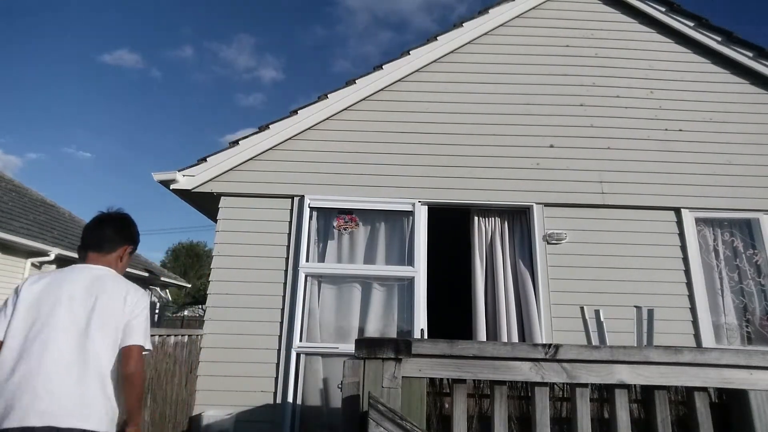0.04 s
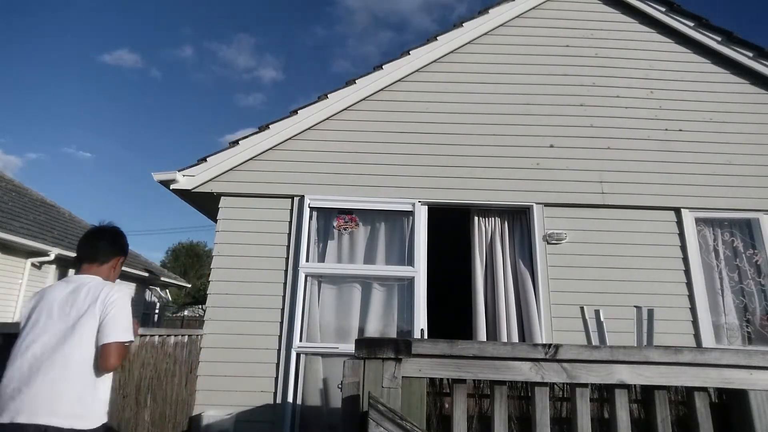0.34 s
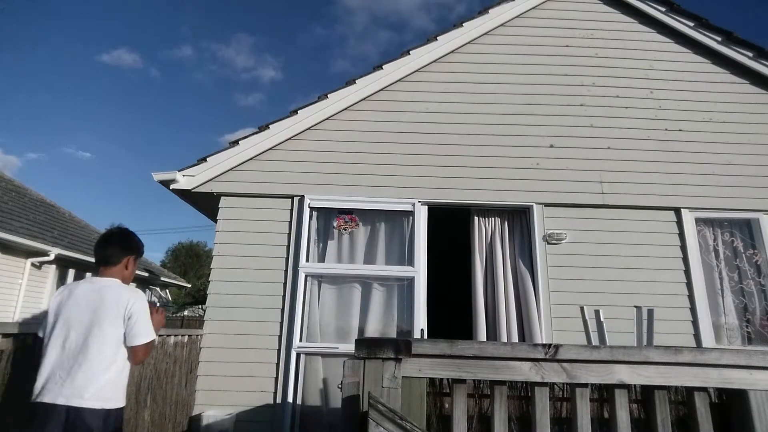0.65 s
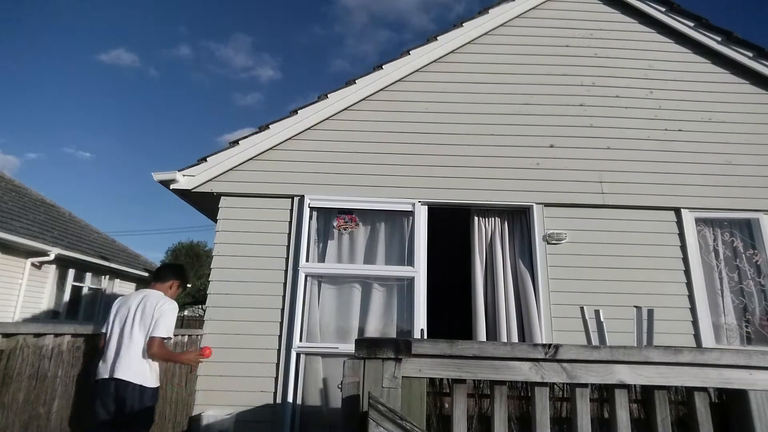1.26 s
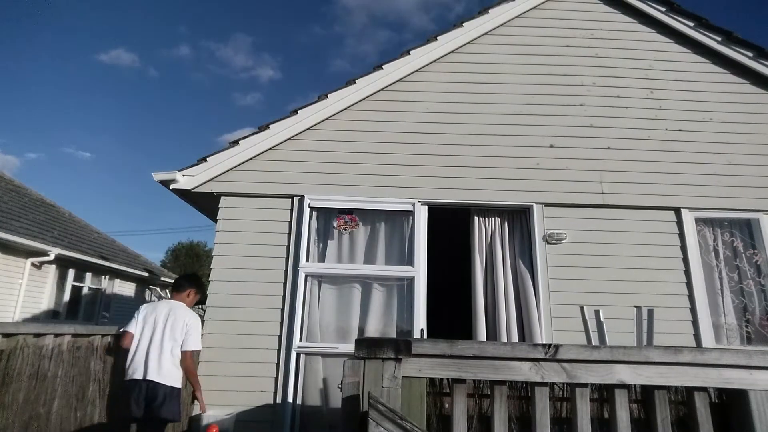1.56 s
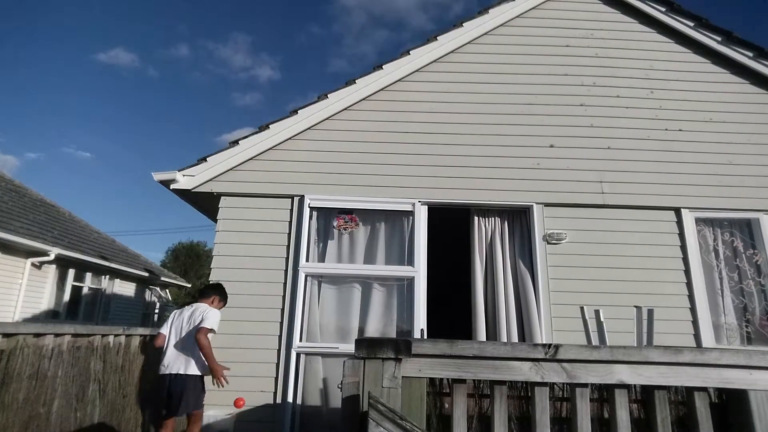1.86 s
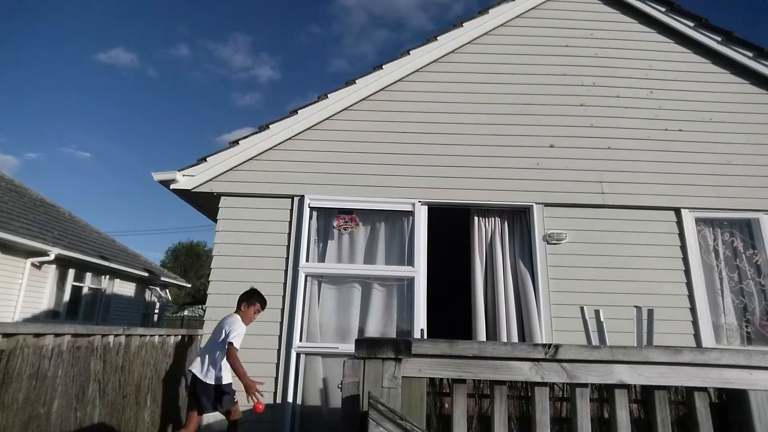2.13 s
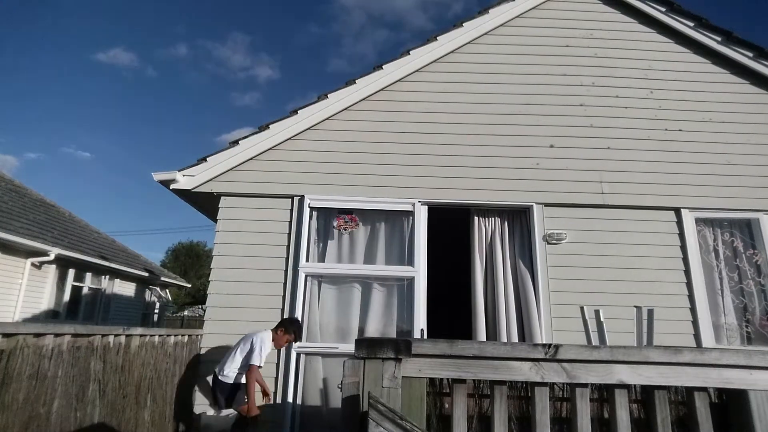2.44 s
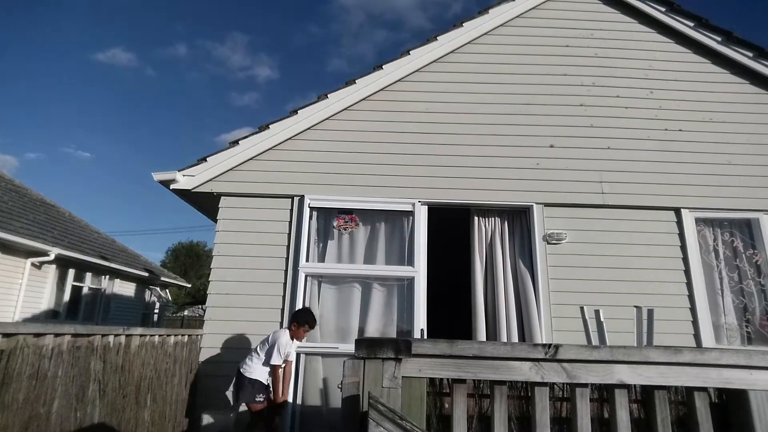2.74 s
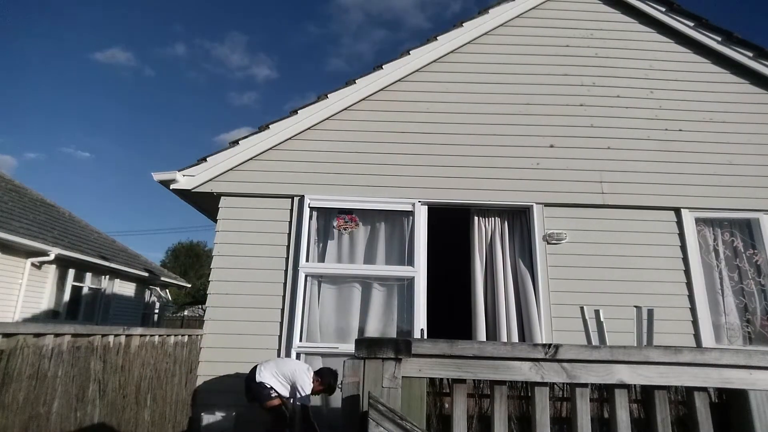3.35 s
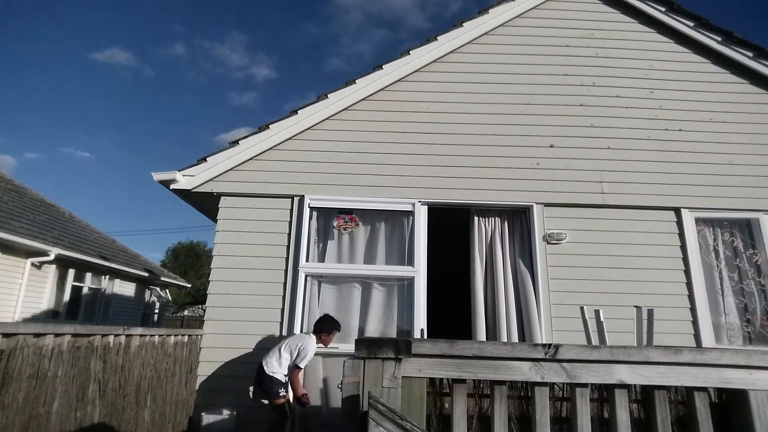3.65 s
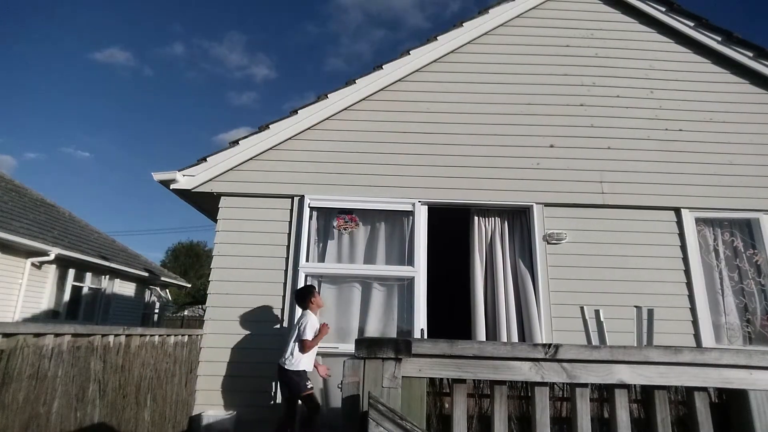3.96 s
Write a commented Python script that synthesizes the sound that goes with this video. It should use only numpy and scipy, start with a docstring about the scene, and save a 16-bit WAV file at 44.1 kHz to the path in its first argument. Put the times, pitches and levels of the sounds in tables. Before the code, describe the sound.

A small hard ball bounces on a yard path, giving a few sharp, unevenly spaced knocks with brief echoes. Wind rumbles on the microphone and grows stronger halfway through, over faint shoe scuffs and distant cicadas.

```python
"""Ball on a path beside a weatherboard house

A small hard ball is bounced and caught; wall and fence throw the knocks back, and shoes scuff on grit.
Far off, cicadas drone and a bird whistles faintly; a small insect gives thin, high chirps.
Gusts buffet each microphone port in turn, and the strongest make the recorder duck."""
import sys
import numpy as np
from scipy import signal
from scipy.fft import rfft, irfft
from scipy.io import wavfile
from scipy.ndimage import uniform_filter1d

SR = 44100
rng = np.random.default_rng(int(sys.argv[2]) if len(sys.argv) > 2 else 0)


def wrap_up_sound(samples):
    """Save the sound to the file named by the first command line argument, as 16-bit audio."""
    columns = np.atleast_2d(samples).T
    # keep every value between -1 and 1, then stretch to whole-number steps
    tamed = np.clip(columns, -1, 1)
    steps = np.round(tamed * 32767).astype(np.int16)
    wavfile.write(sys.argv[1], SR, steps)


N = 176400


def ball():
    """A small hard ball is bounced on the path and caught."""
    # knocks (time [s], relative level [dB], ring pitch [Hz], ring against crack [dB],
    # snap shelf [dB], treble shelf [dB], left over right [dB])
    knocks = [(0.0511, -5.5, 1400, -5.5, 3.5, -3, 2.5), (1.0982, -3, 3380, -20, -11, 9, 2),
              (1.3398, -14.5, 3960, -10, 14, -37, 0), (1.7746, -16, 1050, -19, -3, 7, 10.5),
              (1.7922, -1.5, 1106, -11, -4, 6, 4.5), (2.266, -29, 1280, 0.5, 5, -2, -4),
              (2.4978, -6.5, 1270, -8, -4, -5, 1), (2.8104, -33.5, 3500, -12.5, 5, 11, 4),
              (2.9661, -16.5, 3680, -19.5, 0.5, -19.5, 0.5), (3.3237, -19.5, 1400, -11.5, -8, -6, 0)]
    out = np.zeros((2, N))
    for start, *strike in knocks:
        add(out, start, knock(*strike))
    return out


def knock(db, ring_hz, ring_db, snap_db, treble_db, pan_db):
    """A crack on hard ground with a brief hollow ring, heard through the yard."""
    # spectrum of the crack before its shelves (frequency [Hz], relative level [dB])
    crack_colour = [(100, 9.5), (400, 7), (700, 4.5), (1000, -0.5), (1500, -2.5), (2050, -7), (2900, -12.5),
                    (3800, -4), (4600, -22.5), (5700, -16.5), (7500, -28), (9500, -34.5), (12000, -28),
                    (16000, -31.5)]
    snap_hz, treble_hz, ring_t60_s, trim_db = 2520, 6900, .012, .5
    hollow_hz, hollow_db = 1974, -12.5  # the ball's own ring, shared by every knock
    t = np.arange(4096) / SR
    hz = abs(np.fft.fftfreq(len(t), 1 / SR))
    snap, treble = (hz ** 4 / (hz ** 4 + edge ** 4) for edge in (snap_hz, treble_hz))
    crack = causal(read(crack_colour, hz) + snap_db * snap + treble_db * treble)
    ring, hollow = (np.sin(2 * np.pi * f * t) * amp(-60 * t / ring_t60_s) for f in (ring_hz, hollow_hz))
    parts = (crack, 0), (ring, ring_db), (hollow, hollow_db)
    blow = sum(amp(part_db) * part / np.linalg.norm(part) for part, part_db in parts)
    port_gains = amp(db + trim_db + np.array([[.5], [-.5]]) * pan_db)
    return port_gains * signal.fftconvolve(blow[None], yard(), axes=1)


def yard():
    """Direct sound, slaps off nearby boards, their scatter and a faint long tail."""
    # reflections from ground, wall and fence (delay [s], gain [dB])
    echoes = [(.0011, -7.5), (.0029, -10.5), (.0058, -8.5), (.0098, -9), (0.0134, -9), (.0232, -17.5)]
    response = amp(1.5) * tail(t60_s=.1) + amp(-8.5) * tail(t60_s=.4)
    response[0, 0] += 1
    add(response[1], .0001, np.ones(1))  # the right port hears the ball a little later
    for delay, db in echoes:
        for side in response:
            add(side, delay + rng.uniform(-.00042, .00037), amp([db]))
    return response


def scuffs():
    """Soles drag over grit: grainy hiss that swells and dies, with a short echo off the yard."""
    # shoe drags (start [s], rise [s], hold [s], release [s], level [dB])
    drags = [(1.109, 0.027, 0.084, 0.066, -58), (1.28, 0.041, 0.046, 0.022, -52),
             (1.387, 0.036, 0.035, .018, -44.5), (1.494, 0.037, 0.046, 0.18, -60),
             (1.709, 0.032, 0.018, 0.011, -53), (2.995, .03, 0.023, .04, -63)]
    # spectrum of sole on grit (frequency [Hz], relative level [dB])
    grit_colour = [(600, -3), (1200, -3), (2100, -4.5), (3000, -7), (3700, -7.5), (6600, -14.5),
                   (8200, -25.5), (10000, -23), (13000, -19.5), (16000, -18)]
    grit_db, echo_db = 3, -5.5
    t, level = np.arange(N) / SR, np.zeros(N)
    for start, rise, hold, release, db in drags:
        swell = np.clip((t - start) / rise, 0, 1)
        fade = np.exp(-2 * np.maximum(t - start - rise - hold, 0) / release)
        level += amp(db) * swell * fade
    hiss = level * unit(noise(grit_colour) * amp(grit_db * wander(rate_hz=300)))
    return hiss + amp(echo_db) * signal.fftconvolve(hiss, tail(t60_s=.3), axes=1)[:, :N]


def wind():
    """Sputtering rumble follows the gust at each port; deep booms and bright eddies grow faster still."""
    # gust strength at the left and right ports (time [s], relative level [dB])
    left_gusts = [(0, -30.5), (.05, -18), (.16, -37.5), (.3, -26), (.35, -30.5), (.48, -23), (.68, -42.5),
                  (1.15, -33.5), (1.68, -38), (1.8, -13.5), (1.89, -22), (1.98, -27), (2.02, -15),
                  (2.1, -9.5), (2.15, -22.5), (2.35, -34.5), (2.39, -16.5), (2.44, -12.5), (2.53, -13.5),
                  (2.68, -16.5), (2.8, -25.5), (2.87, -14), (2.97, -27.5), (3.1, -20), (3.26, -12),
                  (3.47, -24.5), (3.62, -16), (3.85, -24), (3.93, -12), (4, -14.5)]
    right_gusts = [(0, -37), (.42, -43), (.5, -22.5), (.68, -17.5), (0.781, -26), (1.04, -27.5),
                   (1.131, -27), (1.36, -24), (1.409, -19.5), (1.619, -25.5), (2.099, -41.5), (2.32, -26),
                   (2.411, -44), (2.6, -30), (2.921, -26.5), (3.199, -17), (3.401, -16.5), (3.48, -28.5),
                   (3.751, -19.5), (4, -23.5)]
    # spectrum of wind on the microphone (frequency [Hz], relative level [dB])
    rumble_colour = [(15, -22), (35, -4), (65, 1), (115, 1), (170, -5.5), (250, -12.5), (400, -23.5),
                     (700, -40.5), (1500, -66.5), (4000, -98)]
    deep_below_hz, eddies_above_hz, trim_db = 70, 130, 2
    deep_growth, eddy_growth, pivot_db = .35, .04, -14.5  # extra dB per dB of gust over the pivot
    t = np.arange(N) / SR
    gust_db = np.array([np.interp(t, *np.transpose(port)) for port in (left_gusts, right_gusts)])
    excess_db = gust_db - pivot_db
    rumble = noise(rumble_colour)
    rumble /= np.sqrt(uniform_filter1d(rumble ** 2, size=2000) + 1e-6)  # steady, so gusts set the level
    deep, low = (signal.sosfiltfilt(signal.butter(2, hz, fs=SR, output="sos"), rumble)
                 for hz in (deep_below_hz, eddies_above_hz))
    booms = deep * amp(deep_growth * excess_db)
    body = low - deep
    eddies = (rumble - low) * flutter(depth_db=5, rate_hz=17.3) * amp(eddy_growth * excess_db)
    sputter = np.array([unit(side) for side in flutter(depth_db=5, rate_hz=22)])
    return amp(trim_db + gust_db) * sputter * (booms + body + eddies)


def buffets():
    """Single eddies strike one port: a sudden swing of pressure that slows and dies."""
    # eddy strikes (time [s], relative level [dB], starting pitch [Hz], port [0 left, 1 right])
    strikes = [(.008, -7, 151, 0), (.037, -6, 254, 0), (0.344, -8.5, 188, 0), (.413, -10.5, 171, 0),
               (0.45, -10, 223, 0), (0.551, -14.5, 320, 1), (0.675, -9.5, 283, 1), (1.056, -5.5, 308, 1),
               (1.121, -6, 150, 1), (1.777, -11, 237, 0), (1.851, -5, 315, 0), (2.006, -1.5, 294, 0),
               (2.024, -3.5, 330, 0), (2.07, 2, 165, 0), (2.09, 1.5, 260, 0), (2.114, -4, 188, 0),
               (2.175, -4, 159, 0), (2.367, -3.5, 154, 0), (2.42, 0, 174, 0), (2.457, -1, 275, 0),
               (2.47, 2, 170, 0), (2.5544, 1, 318, 0), (2.613, -6.5, 200, 0), (2.688, -6.5, 220, 0),
               (2.719, -17, 280, 0), (2.863, -2.5, 125, 0), (3.088, -5, 158.6, 0), (3.145, -10, 310, 1),
               (3.167, -2.5, 290, 1), (3.204, -3, 152, 1), (3.248, -2, 190, 0), (3.264, -1, 150, 0),
               (3.3, -1, 140, 0), (3.381, -7, 159, 1), (3.416, -25, 293, 1), (3.527, -6.5, 260, 0),
               (3.559, -2, 207, 0), (3.587, 0.5, 183, 0), (3.598, -3.5, 199, 0), (3.688, -7.5, 245, 0),
               (3.931, -7, 150, 0), (3.947, -6, 344, 0), (3.986, -6, 323, 0)]
    rise_cycles, slowing_s, top_hz, trim_db = .6, .015, 770, -.5
    t, out = np.arange(0, .04, 1 / SR), np.zeros((2, N))
    for start, db, hz, port in strikes:
        age = t * hz / rise_cycles
        envelope = amp(db + trim_db) * age * np.exp(1 - age)
        turns = hz * slowing_s * np.log1p(t / slowing_s)
        add(out[int(port)], start, envelope * np.sin(2 * np.pi * turns))
    return signal.sosfilt(signal.butter(3, top_hz, fs=SR, output="sos"), out)


def cicadas():
    """A distant chorus, a little to the right: a narrow, drifting buzz that slips down in each throb."""
    # drift of the chorus (time [s], centre pitch [Hz], relative level [dB])
    chorus = [(0, 3780, -59), (.3, 3676, -55.5), (.7, 3813, -60.5), (1.05, 3647, -57), (1.899, 3854, -60.5),
              (2.398, 3694, -59.5), (3.1, 3750, -59.5), (3.501, 3644, -54), (4, 3810, -61)]
    width_hz, sweep_hz, throbs_per_s, throb_db = 160, 150, 18, 2.5
    port_db = np.array([[-2], [1.8]])
    times, hz, db = np.transpose(chorus)
    t = np.arange(N) / SR
    throb = np.cumsum(throbs_per_s * (1 + .21 * wander(rate_hz=2.7))) / SR % 1
    pitch_hz = np.interp(t, times, hz) + sweep_hz * (.5 - throb)
    phase = 2 * np.pi * np.cumsum(pitch_hz) / SR
    buzz = [wander(width_hz) * np.cos(phase) + wander(width_hz) * np.sin(phase) for _ in range(2)]
    return amp(np.interp(t, times, db) + port_db - throb_db * np.cos(2 * np.pi * throb)) * buzz


def chirps():
    """A small insect gives evenly spaced, very high chirps."""
    # runs of chirps (start [s], length [s], relative level [dB])
    runs = [(1.02, .86, -80), (3.0, .42, -83)]
    pitch_hz, width_hz, chirps_per_s = 7550, 130, 8.72
    out = np.zeros((2, N))
    for start, length, db in runs:
        t = np.arange(0, length, 1 / SR)
        pulses = 2 * amp(db) * np.maximum(np.sin(2 * np.pi * chirps_per_s * t), 0) ** 2
        for side in out:
            add(side, start, pulses * wander(width_hz)[:len(t)] * np.sin(2 * np.pi * pitch_hz * t))
    return out


def whistles():
    """Thin notes of a far bird, blurred by distance."""
    # bird notes (start [s], length [s], pitch [Hz], level [dB])
    notes = [(0.576, .35, 1227, -59), (1.645, 0.052, 1210, -56), (3.859, 0.23, 2390, -65)]
    width_hz = 20
    out = np.zeros((2, N))
    for start, length, hz, db in notes:
        t = np.arange(0, length, 1 / SR)
        envelope = amp(db) * np.sqrt(abs(np.sin(np.pi * t / length)))
        for side in out:
            blur = 1 + .5 * (wander(width_hz) + 1j * wander(width_hz))[:len(t)]
            note = (blur * np.exp(2j * np.pi * hz * t)).real
            add(side, start, envelope * unit(note))
    return out


def outdoor_air():
    """The low, steady hush of the open air behind everything."""
    # spectrum of the hush (frequency [Hz], relative level [dB])
    air_colour = [(30, -9), (100, -1), (250, -9), (500, -7), (800, -11.5), (1300, -20.5), (2200, -23),
                  (3000, -30), (4500, -38.5), (6000, -46.5), (8500, -51.5), (10000, -59.5), (12500, -50),
                  (16000, -44)]
    return amp(-45) * noise(air_colour)


def amp(db):
    """Decibels to gain."""
    return 10 ** (np.asarray(db) / 20)


def unit(x):
    """Scales to an rms of one."""
    return x / np.sqrt(np.mean(x ** 2) + 1e-20)


def read(points, hz):
    """Reads a spectrum on a log-frequency axis."""
    f, db = np.transpose(points)
    return np.interp(np.log(hz + 1), np.log(f), db)


def add(mix, start_s, sound):
    """Mixes a sound in at a time."""
    part = mix[..., max(round(start_s * SR), 0):][..., :sound.shape[-1]]
    part += sound[..., :part.shape[-1]]


def noise(colour):
    """Two unrelated channels of noise with a given spectrum."""
    gains = amp(read(colour, np.fft.rfftfreq(N, 1 / SR)))
    return unit(irfft(rfft(rng.standard_normal((2, N))) * gains, N))


def wander(rate_hz):
    """A smooth random curve."""
    rolloff = np.exp(-.5 * (np.fft.rfftfreq(N, 1 / SR) / rate_hz) ** 2)
    return unit(irfft(rfft(rng.standard_normal(N)) * rolloff, N))


def flutter(depth_db, rate_hz):
    """A gain that wavers up and down at random, different at each port."""
    return amp(depth_db * np.tanh([wander(rate_hz), wander(rate_hz)]))


def causal(db):
    """The sharpest impulse that has this spectrum (given over the full circle)."""
    return np.fft.ifft(np.exp(np.conj(signal.hilbert(np.log(amp(db)))))).real


def tail(t60_s):
    """Diffuse reflections of unit energy, different at each port."""
    t = np.arange(SR // 2) / SR
    x = rng.standard_normal((2, len(t))) * amp(-60 * t / t60_s) * (1 - np.exp(-t / .0011))
    return x / np.linalg.norm(x, axis=1, keepdims=True)


def scene():
    """Ball and shoes on the path, wind on the microphone, insects and a bird beyond."""
    return ball() + scuffs() + wind() + buffets() + cicadas() + chirps() + whistles() + outdoor_air()


def record(dry):
    """The recorder's gain control ducks under strong gusts; peaks are rounded and the top is cut."""
    threshold_db, duck_share, recover_db_per_s, top_hz = -11, .42, 44.5, 16000
    power_db = 10 * np.log10(abs(uniform_filter1d((dry ** 2).max(0), size=600)) + 1e-12)
    fall_db = np.arange(N) * recover_db_per_s / SR
    held_db = np.maximum.accumulate(power_db + fall_db) - fall_db  # jumps to a peak, then sinks
    over_db = np.maximum(held_db - threshold_db, 0)
    ducked = dry * amp(-duck_share * uniform_filter1d(over_db, size=200))
    rounded = ducked / (1 + ducked ** 8) ** (1 / 8)
    padded = np.pad(rounded, ((0, 0), (255, 255)), mode="edge")
    band_limit = signal.firwin(511, top_hz, window=("kaiser", 9), fs=SR)
    return signal.oaconvolve(padded, band_limit[None], "valid")


dry = scene()
out = record(dry)
wrap_up_sound(out)
```